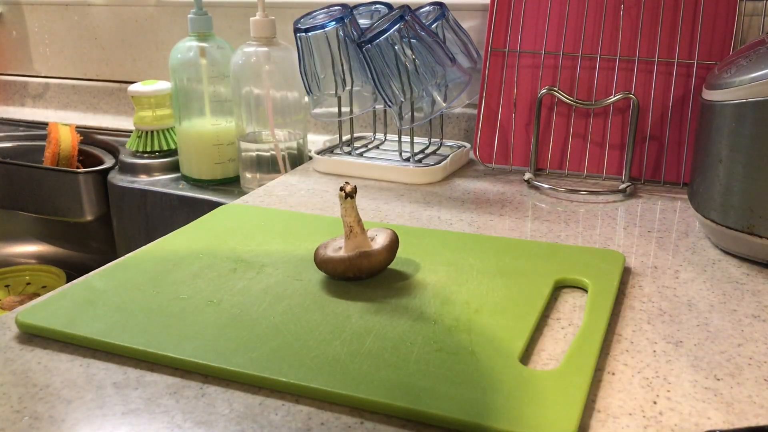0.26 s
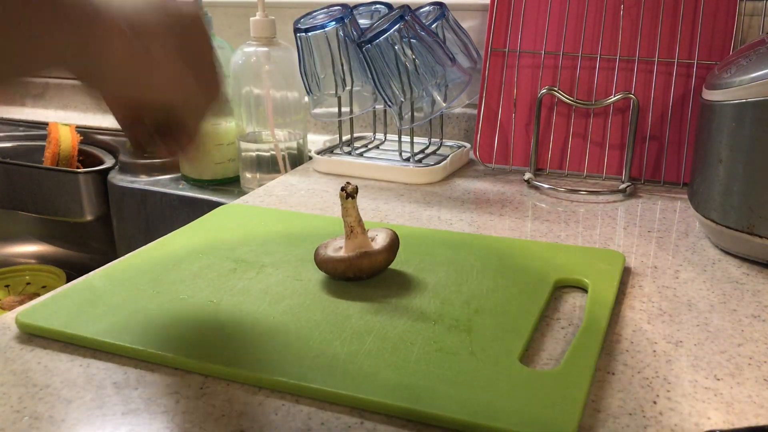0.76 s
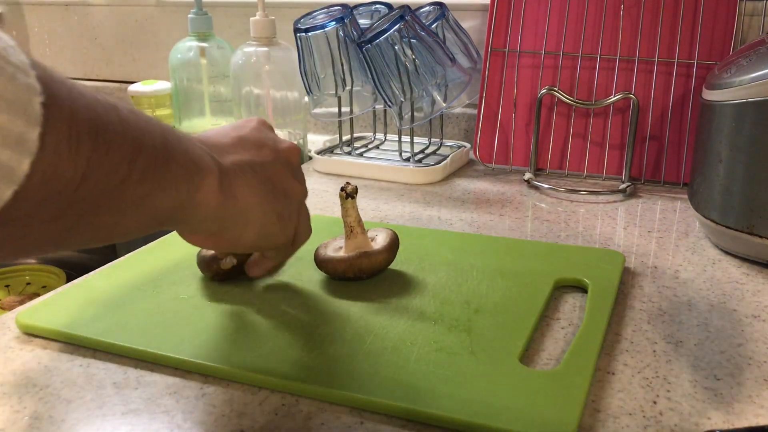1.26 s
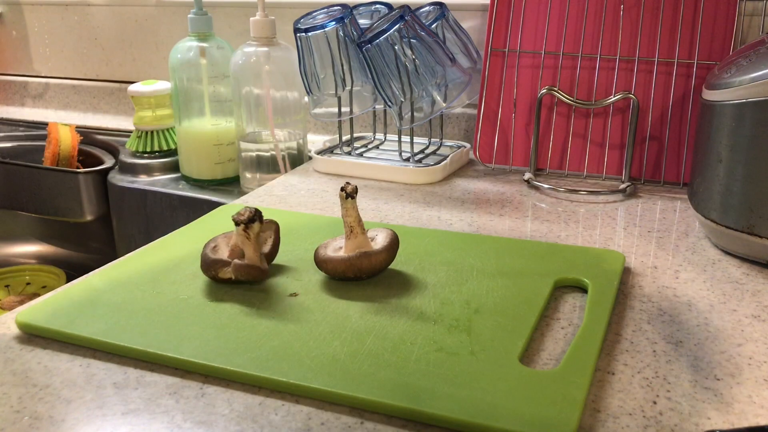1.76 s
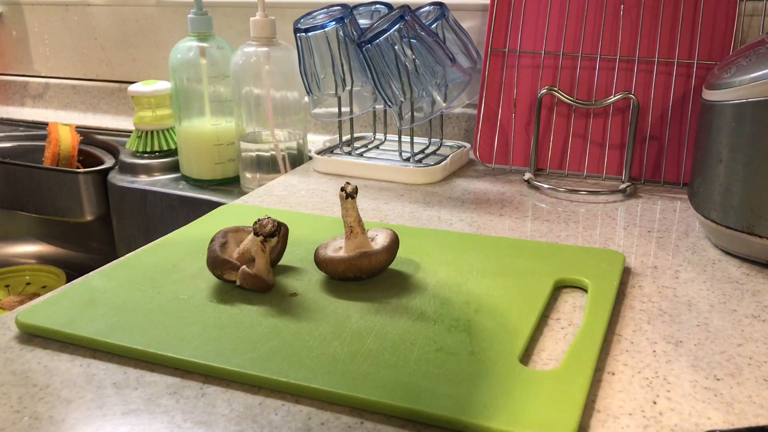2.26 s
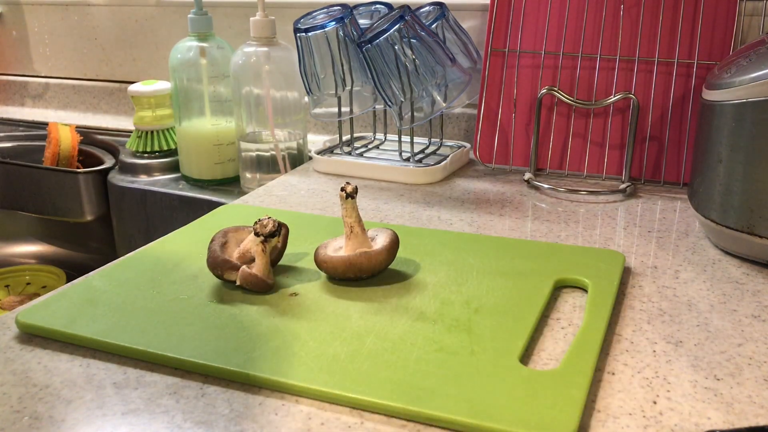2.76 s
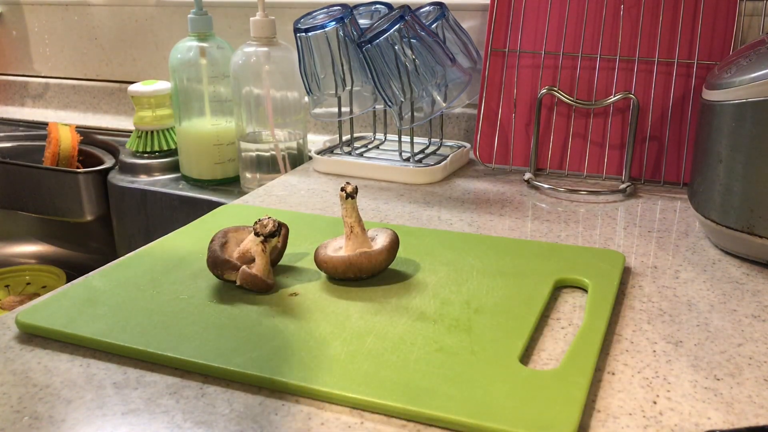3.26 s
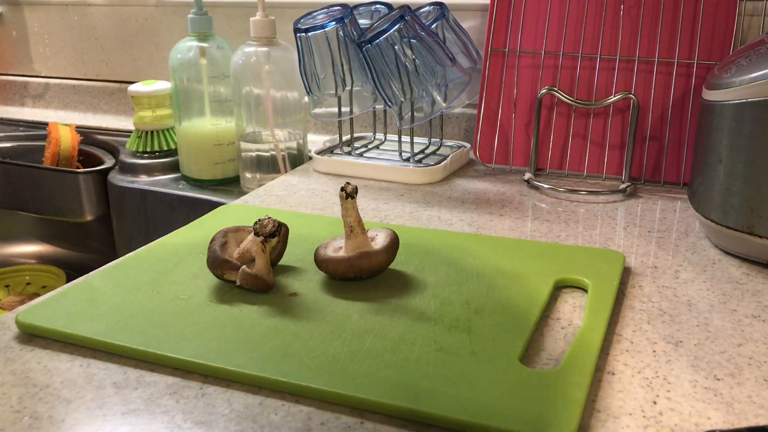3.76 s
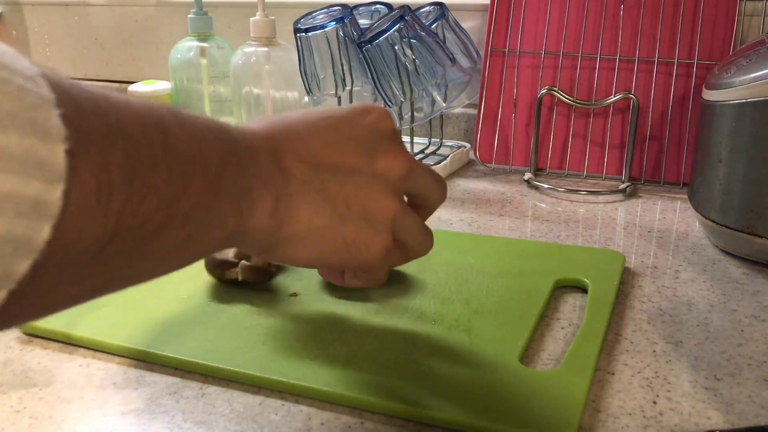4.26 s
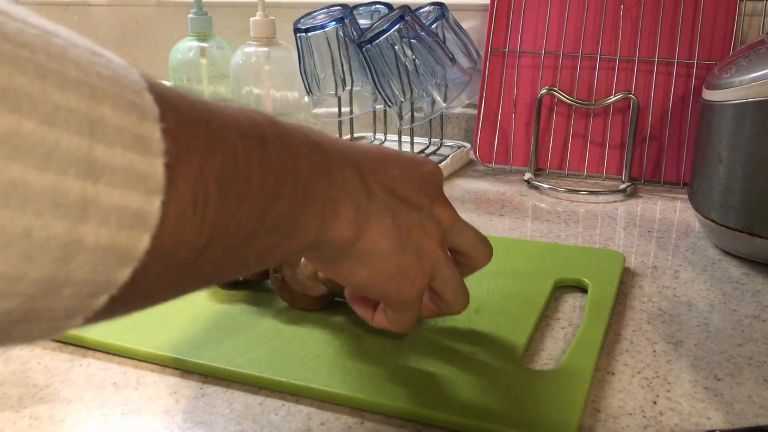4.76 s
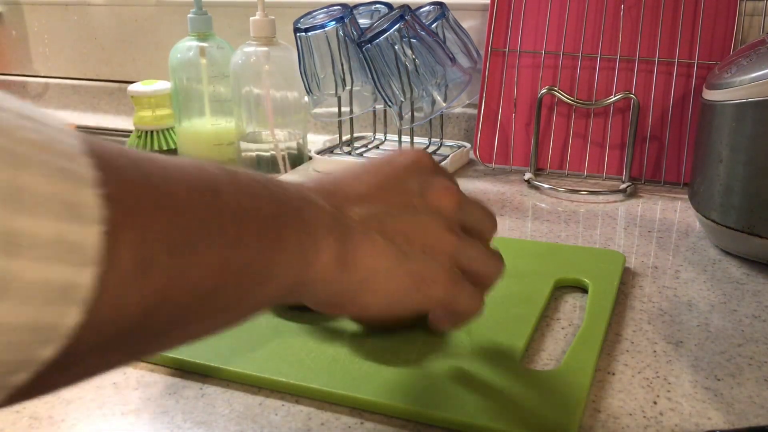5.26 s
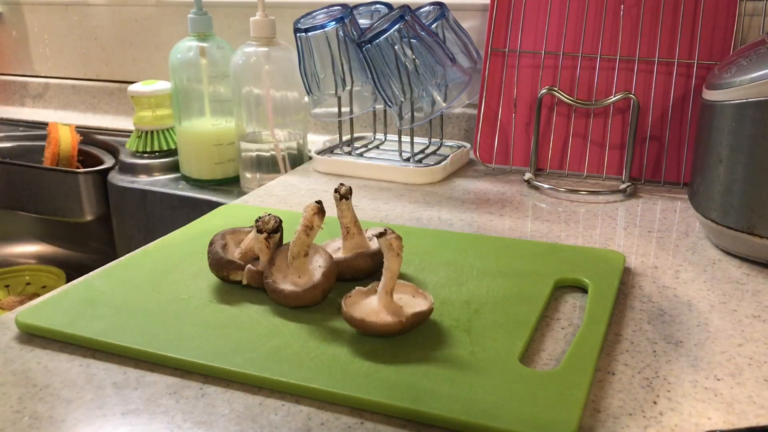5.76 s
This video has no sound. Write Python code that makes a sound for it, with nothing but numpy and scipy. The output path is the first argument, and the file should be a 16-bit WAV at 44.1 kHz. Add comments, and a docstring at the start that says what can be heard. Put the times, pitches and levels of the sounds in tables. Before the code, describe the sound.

Crisp thin plastic crackles right away, then stops, leaving a few ticks, dry scuffs and a soft thump on a cutting board. The bag is rummaged again, longer and more vigorously, with low thuds beneath. Another pause holds gentle mushroom placements and faint skin rubbing before one brief, weaker rustle. Close microphone, short kitchen reverberation, and very quiet steady air and appliance hum.

```python
"""A hand rummages in a thin plastic bag beside a cutting board in a small kitchen, over a steady faint hum.
First the hand stirs: dense crinkle (random buckles) with sharp snaps (creases flipping) that the room answers.
Then it pauses: dry skins scuff (noise bursts) and mushrooms land in thuds (damped low sines) as the bag ticks.
A second, longer rummage follows, with more thuds, then a pause in which fingers also rub the caps (tiny slips).
A third, short rummage ends the scene."""
import sys
import numpy as np
from scipy import signal
from scipy.fft import rfft, irfft, next_fast_len
from scipy.io import wavfile
from scipy.ndimage import uniform_filter1d, map_coordinates

SR = 44100
rng = np.random.default_rng(int(sys.argv[2]) if len(sys.argv) > 2 else 0)


def wav_out(sig):
    """Save sig, one row per channel (or a flat mono array), as 16-bit PCM at SR to the path in sys.argv[1]."""
    wavfile.write(sys.argv[1], SR, np.round(np.clip(np.atleast_2d(sig).T, -1, 1) * 32767).astype(np.int16))


N = 265041

# All levels in the event and spectrum tables are relative within their table.
# Still kitchen air, spectral density: frequency_hz, level_db (per Hz)
AIR_SPECTRUM = [(20, -38), (32, -7.5), (45, -1.5), (100, -6), (130, -12.5), (260, -12), (500, -20.5),
                (750, -21.5), (1200, -25.5), (2500, -33.5), (6000, -36), (10500, -39), (13000, -29),
                (16000, -33.5)]
# Partials of an appliance's hum: frequency_hz, level_db
HUM_PARTIALS = [(145.3, -79), (371.4, -81.5), (732.1, -83), (861.3, -92), (8468, -104)]
# Spells with the hand in the bag, stirring lightly: start_s, end_s, level_db
STIR_BOUTS = [(0.0, 0.46, -48), (1.70, 3.038, -44.5), (3.134, 3.451, -49.5), (5.688, 6.01, -51)]
# Grabs that crush a fold and bend the sheet: peak_s, rise_s, crinkle_db, flexing_db
SQUEEZES = [(0.01, .02, -35.5, -43), (0.098, 0.014, -36.5, -38), (0.177, .015, -37.5, -43),
            (0.233, .011, -47, -47), (0.283, 0.018, -39, -47.5), (0.368, 0.022, -43, -46.5),
            (0.46, 0.01, -37, -51), (0.56, 0.019, -53, -54.5), (1.717, .009, -49, -48),
            (1.796, 0.042, -34.5, -42.5), (1.87, 0.013, -32.5, -37), (1.961, 0.0076, -31, -37.5),
            (2.01, 0.012, -38, -49), (2.107, 0.022, -42, -39), (2.227, 0.021, -32, -46.5),
            (2.301, 0.024, -32, -40), (2.384, 0.023, -33.5, -41), (2.428, 0.013, -30, -40),
            (2.475, 0.021, -37.5, -44.5), (2.53, 0.016, -37, -44), (2.552, 0.012, -30, -39),
            (2.647, 0.027, -34.5, -46), (2.695, 0.015, -31, -37), (2.776, 0.013, -30.5, -43.5),
            (2.839, 0.018, -35, -45.5), (2.961, 0.018, -28.5, -40), (3.01, 0.01, -37, -47.5),
            (3.098, 0.023, -48, -48.5), (3.191, 0.016, -37.5, -47), (3.253, 0.022, -31.5, -41),
            (3.328, .011, -32.5, -40), (3.412, 0.014, -42.5, -47.5), (3.449, 0.0092, -44, -44.5),
            (3.57, 0.041, -56, -64.5), (5.378, 0.015, -56, -60.5), (5.606, 0.014, -51.5, -52),
            (5.662, .012, -48.5, -58), (5.713, 0.017, -42, -45.5), (5.787, .031, -37, -45.5),
            (5.925, 0.01, -41.5, -44.5), (6.0, 0.017, -39.5, -49.5)]
# Crinkle of the film, spectral density: frequency_hz, level_db (per Hz)
FILM_SPECTRUM = [(400, -29), (750, -3), (1050, -5), (1350, -1.5), (1900, 2.5), (3000, 2), (4200, 3),
                 (5000, -1.5), (6300, 1), (8800, -2.5), (10400, -5.5), (12500, 0.5), (16000, -5.5)]
# Flexing of the whole sheet, spectral density: frequency_hz, level_db (per Hz)
SHEET_SPECTRUM = [(29, -27), (50, -3), (86, -2.5), (152, -5), (257, 0.5), (314, -2.5), (494, -8.5),
                  (603, -2), (758, -10.5), (979, -2.5), (1500, -17), (1950, -27), (3300, -120)]
# Large creases snapping through: start_s, level_db, brightness_db
SNAPS = [(0.0253, -19.5, -7.5), (0.063, -18, -6), (0.0967, -10, -0.5), (0.2593, -8, 0.5),
         (0.2817, -11.5, 0), (0.3415, -13, -2.5), (0.3618, -14, 1), (0.369, -13.5, -0.5),
         (0.409, -17.5, -5.5), (0.4675, -14.5, 0.5), (0.624, -38.5, -4.5), (0.6843, -35.5, 11),
         (0.7192, -26.5, 0.5), (0.7995, -47, -2), (1.0355, -27.5, 1), (1.701, -21.5, 0), (1.7462, -13, 3),
         (1.7586, -9, 1), (1.784, -13, 0.5), (1.8073, -13, 8), (1.8462, -8.5, 2), (1.8582, -5.5, 1),
         (1.8784, -13.5, -2.5), (1.983, -14, -3), (2.0242, -17.5, -3.5), (2.0626, -16, 2),
         (2.0827, -7.5, 0), (2.1088, -13, 11), (2.1133, -9, -2), (2.2017, -19, -3), (2.2147, -16.5, 7),
         (2.2567, -15.5, -4.5), (2.2854, -15, 17), (2.2911, -12, -2), (2.355, -11, -1.5),
         (2.364, -11.5, 7.5), (2.4995, -13, -0.5), (2.5126, -11.5, -2.5), (2.5218, -13, 2),
         (2.5598, -12, 3), (2.6918, -7, 1.5), (2.7279, -9, -1), (2.8272, -17.5, -2), (2.902, -18.5, -1),
         (2.9236, -19.5, -4.5), (3.015, -21.5, -7), (3.0895, -20.5, -3), (3.1474, -27, -7.5),
         (3.162, -24, 4), (3.1752, -17.5, 8), (3.2119, -3.5, 4), (3.5355, -24.5, -3), (3.7835, -20, -2.5),
         (4.2755, -22, -2.5), (4.3843, -32, -3.5), (5.336, -24.5, 1.5), (5.4847, -30.5, -2),
         (5.5706, -24, -1.5), (5.5999, -21, -6), (5.655, -27, -3.5), (5.6933, -21, 1), (5.708, -15, 7),
         (5.7422, -17, -2.5), (5.7655, -15.5, -3.5), (5.8208, -18, 1.5), (5.955, -16.5, 0.5)]
# Frequency response of a crease: frequency_hz, gain_db
CREASE_RESPONSE = [(100, -25), (300, -3.5), (750, -3), (1100, 1.5), (1400, -2.5), (3000, -1.5),
                   (4800, -5.5), (6500, -0.5), (8500, -1.5), (10500, -3.5), (13000, 2.5), (16000, -2.5)]
# Decay of the room's echo: frequency_hz, t60_s
KITCHEN_DECAY = [(150, 0.42), (1000, 0.42), (5000, 0.21), (15000, 0.18)]
# Mushrooms and fingers scuffing the board: start_s, level_db
SCUFFS = [(0.5476, -40.5), (0.9343, -43.5), (1.1035, -41.5), (1.1139, -41), (1.1553, -43.5),
          (1.1842, -47.5), (3.6206, -38), (3.6474, -33), (3.7174, -45), (4.066, -49.5), (4.6488, -48),
          (4.78, -56), (5.0554, -47), (5.1033, -49.5), (5.1672, -41.5), (5.4209, -40), (5.4392, -45.5),
          (5.536, -37.5)]
# Frequency response of a scuffing skin: frequency_hz, gain_db
SKIN_RESPONSE = [(200, -2.5), (700, 4.5), (1600, 3), (3500, -0.5), (6500, -10), (12000, -14)]
# Soft landings on the board: start_s, level_db, pitch_hz
THUDS = [(0.948, -45.5, 72), (1.719, -40.5, 106), (1.84, -38, 102), (2.308, -35.5, 64), (2.938, -36, 98),
         (3.243, -44, 112), (4.074, -38.5, 72), (4.139, -47, 65), (4.653, -37.5, 71.2), (5.061, -42.5, 64),
         (5.11, -42.5, 81.6), (5.208, -46.5, 88.8), (5.643, -44.5, 131), (5.734, -36.5, 75.4)]
# Fingers sliding over the caps: peak_s, rise_s, level_db
RUBS = [(4.235, 0.039, -60), (5.05, 0.14, -72), (5.49, .05, -67)]
# Frequency response of rubbed caps: frequency_hz, gain_db
CAP_RESPONSE = [(300, -21), (1000, -7), (1900, -2.5), (3500, -5), (7000, -17), (14000, -19)]

TOP_HZ = 16000  # band limit
RELAX = 1.32  # a squeeze or rub lets go this many times more slowly than it rises
STIR_ATTACK_S, STIR_RELEASE_S = 0.012, 0.026
STIR_FLEX_DB = -5.5  # drive of the sheet relative to the crinkle under light stirring
SNAP_LOW_DB, SNAP_TOP_DB = -7, -6.5  # at brightness 0: tilt at 1.5 and 11 kHz against 4.5 kHz
# shiver against crack for a snap listed at 0 dB; its growth for each dB that a snap is weaker
SHIVER_DB, SHIVER_PER_DB = 1, 0.08


def amp(db):
    """Level law: decibels to amplitude gain."""
    return 10 ** (np.asarray(db) / 20)


def unit(x):
    """Normalisation: equal mean power, scaled to rms 1."""
    return x / np.sqrt(np.mean(x ** 2) + 1e-20)


def along(points, hz):
    """Interpolation of (frequency, value) points on a logarithmic frequency axis."""
    f, v = np.transpose(points)
    return np.interp(np.log(hz + 1), np.log(f + 1), v)


def colour(x, gain_db):
    """Minimum-phase filtering: a causal response derived from its gain in dB by way of the cepstrum."""
    m = 2 * next_fast_len(len(x) // 2 + 2048)
    gain = amp(gain_db(np.fft.rfftfreq(m, 1 / SR)))
    cepstrum = irfft(np.log(np.maximum(gain, 1e-5)))
    # folding negative time onto positive time makes the filter causal
    cepstrum[1:m // 2] *= 2
    cepstrum[m // 2 + 1:] = 0
    response = np.exp(rfft(cepstrum))
    return irfft(rfft(x, m) * response)[:len(x)]


def shaped(x, spectrum):
    """Spectral shaping: x filtered by a table of (frequency, gain), at rms 1."""
    return unit(colour(x, lambda hz: along(spectrum, hz)))


def wobble(rate):
    """Slow random modulation: a smooth curve through random knots, rate of them a second."""
    knots = rng.standard_normal(int(N * rate / SR) + 4)
    return map_coordinates(knots, [np.arange(N) * rate / SR])


def add(track, s, sound):
    """Superposition: a sound is summed into the track from time s."""
    part = track[max(round(s * SR), 0):][:len(sound)]
    part += sound[:len(part)]


def background():
    """Stationary noise and tones: low rumble, faint hiss, and a hum whose partials wander in phase."""
    t = np.arange(N) / SR
    hum = sum(amp(db + 7.0) * np.sin(2 * np.pi * hz * t + 0.54 * wobble(8.8)) for hz, db in HUM_PARTIALS)
    air_gain = amp(-60.1 + 0.44 * wobble(2.1))
    return hum + air_gain * shaped(rng.standard_normal(N), AIR_SPECTRUM)


def stir():
    """Envelope of sustained excitation: attack, hold and release while the hand is in the bag."""
    t = np.arange(N) / SR
    gain = np.zeros(N)
    for start, end, db in STIR_BOUTS:
        attack = np.clip((t - start) / STIR_ATTACK_S, 0, 1)
        release = np.exp(-np.maximum(t - end, 0) / STIR_RELEASE_S)
        gain += amp(db) * attack * release
    return gain


def swell(s, rise):
    """Envelope of transient pressure: a Gaussian peak at time s that relaxes more slowly than it builds."""
    u = (np.arange(N) / SR - s) / rise
    return np.exp(-.5 * np.where(u < 0, u, u / RELAX) ** 2)


def crinkle(rate, spread_db, shiver_t60, shiver_db):
    """Random impulse excitation: small buckles of random time and size, each with a decaying shiver."""
    happens, size, sign = rng.random((3, N))
    pushes = (happens < rate / SR) * amp(spread_db * size ** 2) * np.sign(sign - .5)
    keep = amp(-60 / (shiver_t60 * SR)) ** 2  # share of the shiver's energy left after one sample
    energy = signal.lfilter([1 - keep], [1, -keep], pushes ** 2)
    shiver = np.sqrt(energy) * rng.standard_normal(N)
    out = pushes + amp(shiver_db) * shiver
    # the hand's effort is spread evenly over each 25 ms
    power = np.abs(uniform_filter1d(out ** 2, size=1100))
    return out / np.sqrt(power + 1e-9)


def patchy(x, depth_db):
    """Shifting resonance: random gains, smooth in time and frequency, vary the colour between crackles."""
    z = signal.stft(x, nperseg=512)[2]
    field = uniform_filter1d(rng.standard_normal(z.shape), size=8, axis=0)
    field = uniform_filter1d(field, size=4, axis=1)
    return unit(signal.istft(z * amp(depth_db * unit(field)), nperseg=512)[1][:N])


def bag():
    """Buckling of a thin sheet: fine crinkle swells with each squeeze, over duller flapping of the sheet."""
    light = stir()
    crush_power, bend_power = np.zeros(N), np.zeros(N)
    for s, rise, crinkle_db, flex_db in SQUEEZES:
        pressure = swell(s, rise)
        crush_power += (amp(crinkle_db) * pressure) ** 2
        bend_power += (amp(flex_db) * pressure) ** 2
    grains = patchy(crinkle(rate=330, spread_db=11.5, shiver_t60=0.064, shiver_db=4.5), depth_db=2.0)
    flaps = patchy(crinkle(rate=300, spread_db=8, shiver_t60=0.064, shiver_db=5.5), depth_db=2.0)
    # powers of stirring and squeezing add
    crinkle_gain = np.hypot(light, np.sqrt(crush_power))
    flex_gain = amp(-1.34) * np.hypot(amp(STIR_FLEX_DB) * light, np.sqrt(bend_power))
    return crinkle_gain * shaped(grains, FILM_SPECTRUM) + flex_gain * shaped(flaps, SHEET_SPECTRUM)


def ripple(depth_db, count=36):
    """Individual resonance: random (frequency, gain) points give each fold a colour of its own."""
    return np.transpose([np.geomspace(300, TOP_HZ, count), depth_db * rng.standard_normal(count)])


def buckle(t, crack_t60, shiver_t60, shiver_db):
    """Snap-through instability: a crease flips in a short crack, then the film around it shivers."""
    crack = amp(-60 * t / crack_t60) * rng.standard_normal(len(t))
    shiver = amp(-60 * t / shiver_t60) * rng.standard_normal(len(t))
    crack[0] = rng.choice([-1, 1]) * 2  # the flip itself is one sharp push, in or out
    crack = signal.lfilter([1, -.35], [1], crack)  # so small a spot radiates little bass
    shiver = shiver * (1 - np.exp(-t / 0.00017))
    return crack / np.linalg.norm(crack) + amp(shiver_db) * shiver / np.linalg.norm(shiver)


def snaps():
    """Sudden release: large creases let go one by one; the stronger, the less shiver beside the crack."""
    out, t = np.zeros(N), np.arange(SR // 12) / SR
    for s, db, bright_db in SNAPS:
        tilt = [(1500, SNAP_LOW_DB - bright_db), (4500, 0.0054), (11000, SNAP_TOP_DB + bright_db)]
        fold = ripple(depth_db=3.0)
        flip = buckle(t, crack_t60=0.0025, shiver_t60=0.075, shiver_db=SHIVER_DB - SHIVER_PER_DB * db)
        snap = colour(flip, lambda hz: along(CREASE_RESPONSE, hz) + along(tilt, hz) + along(fold, hz))
        add(out, s + .0008, amp(db + 9.5) * snap / np.linalg.norm(snap))
    return out


def kitchen(x):
    """Reverberation: convolution with a delayed noise tail whose treble dies first."""
    hz, t, z = signal.stft(rng.standard_normal(SR // 2), SR, nperseg=256)
    decay = amp(-60 * t / along(KITCHEN_DECAY, hz)[:, None])
    tail = signal.istft(z * decay, SR, nperseg=256)[1]
    delayed = np.pad(tail, (220, 0))  # 5 ms
    return signal.fftconvolve(x, delayed / np.linalg.norm(tail))[:N]


def scuffs(t60=0.087, attack=0.0013):
    """Sliding friction: dry mushroom skin slips on the plastic in a decaying burst of coloured noise."""
    out, t = np.zeros(N), np.arange(SR // 6) / SR
    for s, db in SCUFFS:
        rough = shaped(rng.standard_normal(len(t)), ripple(depth_db=4))
        envelope = amp(db - 9.5 - 60 * t / t60) * (1 - np.exp(-t / attack))
        add(out, s, envelope * shaped(rough, SKIN_RESPONSE))
    return out


def thuds(t60=0.083, attack=0.0095):
    """Damped oscillation: a soft weight sets board and counter swinging for a few low cycles."""
    out, t = np.zeros(N), np.arange(SR // 3) / SR
    for s, db, hz in THUDS:
        envelope = amp(db + 8.0 - 60 * t / t60) * (1 - np.exp(-(t / attack) ** 2))
        add(out, s, envelope * np.sin(2 * np.pi * hz * t))
    return out


def fingers():
    """Stick-slip friction: skin slides over the dry caps in tiny jerks."""
    gain = sum(amp(db) * swell(s, rise) for s, rise, db in RUBS)
    slips = crinkle(rate=260, spread_db=19, shiver_t60=0.055, shiver_db=7)
    return amp(-5.0) * gain * patchy(shaped(slips, CAP_RESPONSE), depth_db=4.5)


def scene():
    """Superposition of sources: bag and board with the room's answer, thuds and background."""
    near = bag() + snaps() + scuffs() + fingers()
    return (near + amp(-12) * kitchen(near) + thuds() + background())[None]


def record(dry):
    """Band limitation: the microphone sheds the deepest bass, and nothing is kept above TOP_HZ."""
    m = next_fast_len(N + SR // 2)
    lean = signal.sosfilt(signal.butter(4, 38, "highpass", fs=SR, output="sos"), dry)
    passband = np.fft.rfftfreq(m, 1 / SR) < TOP_HZ
    return irfft(rfft(lean, m) * passband, m)[..., :N]


dry = scene()
out = record(dry)
wav_out(out)
```